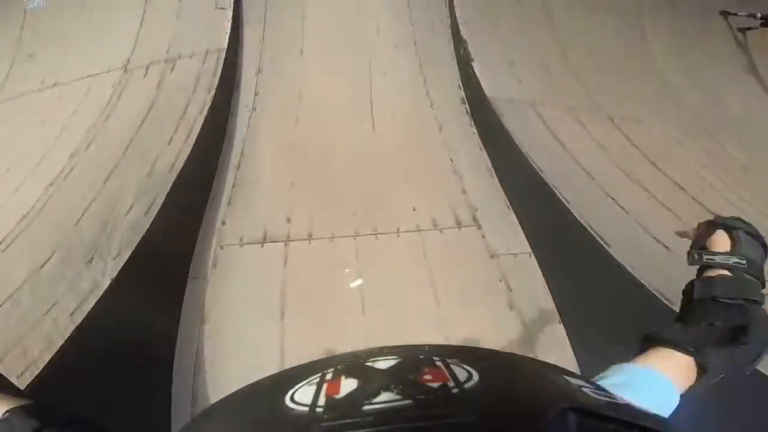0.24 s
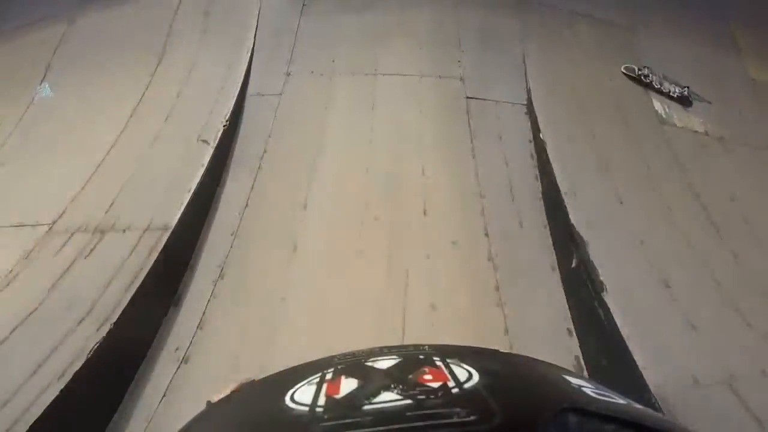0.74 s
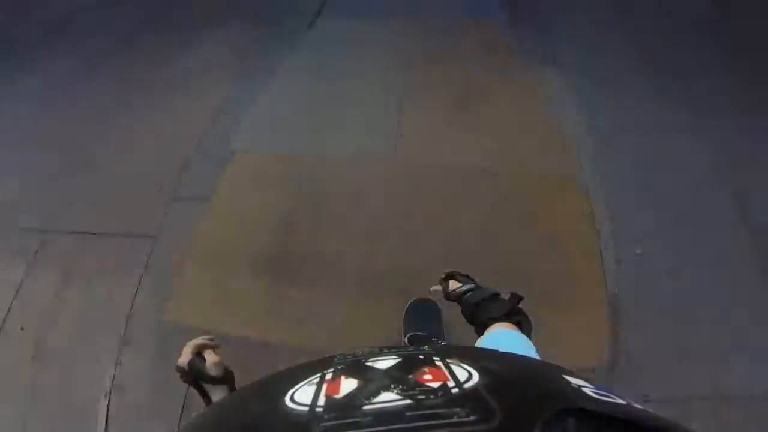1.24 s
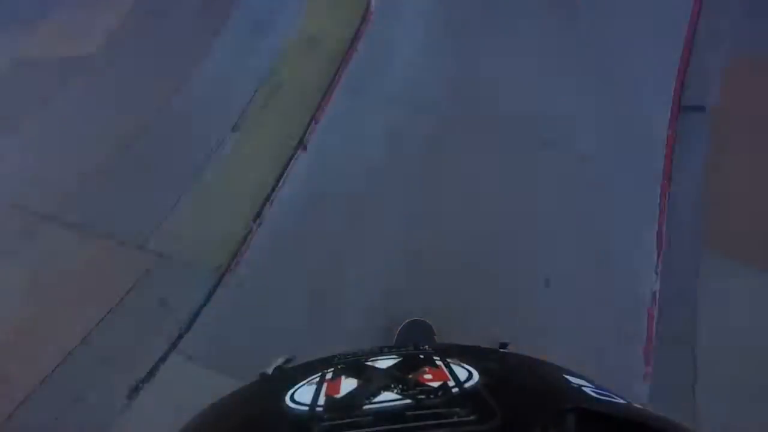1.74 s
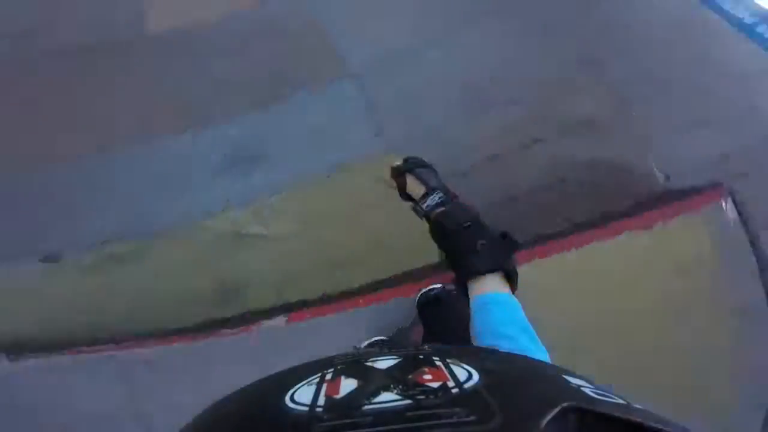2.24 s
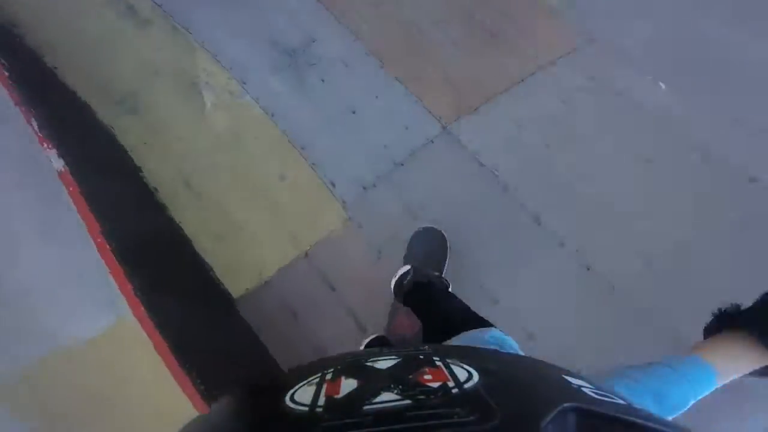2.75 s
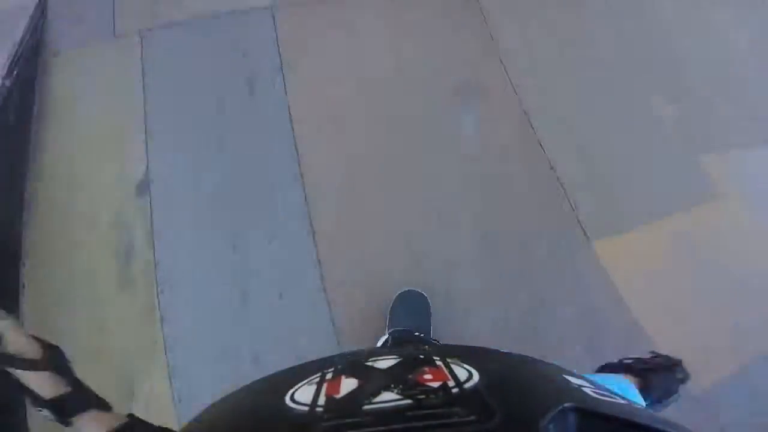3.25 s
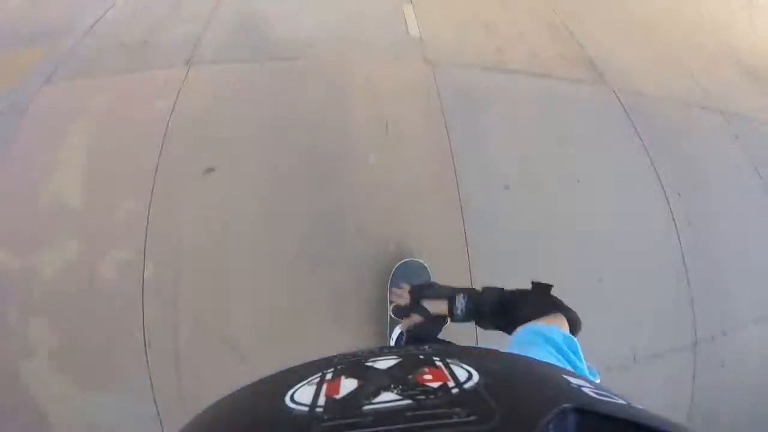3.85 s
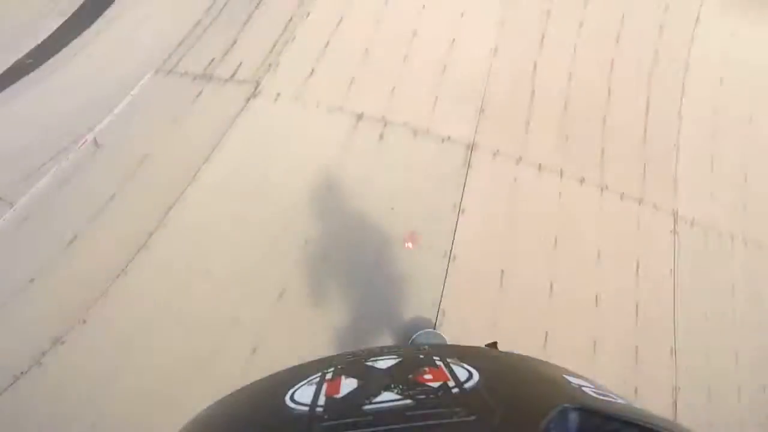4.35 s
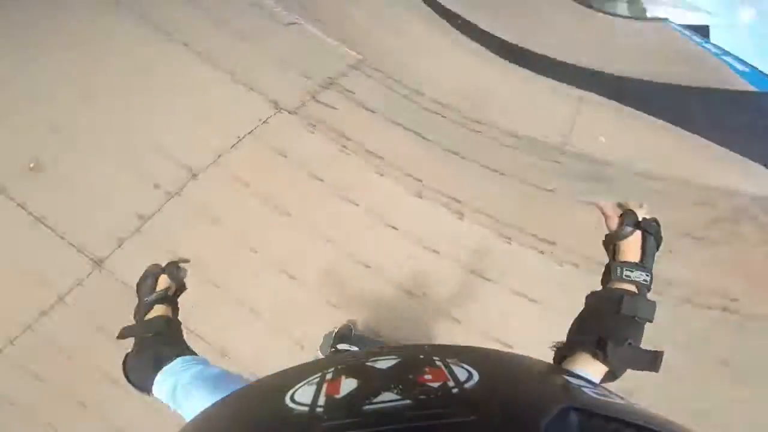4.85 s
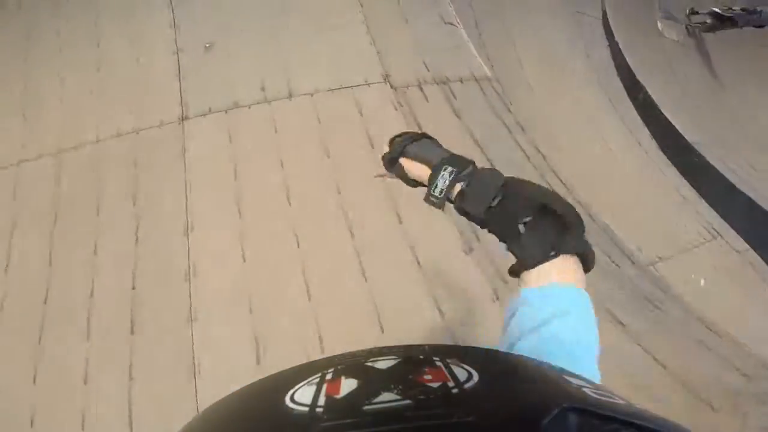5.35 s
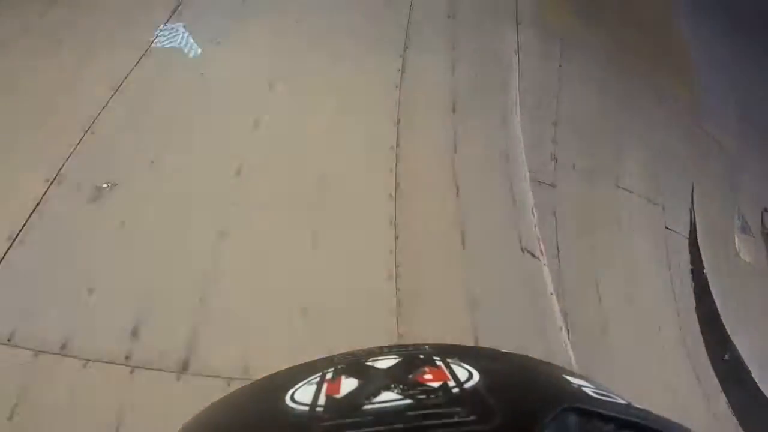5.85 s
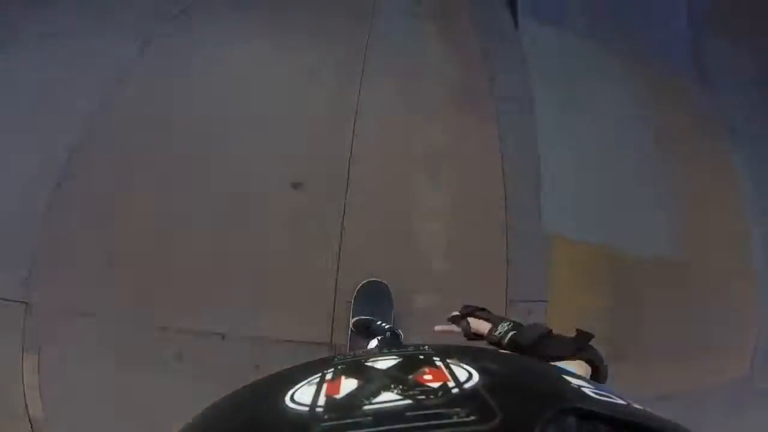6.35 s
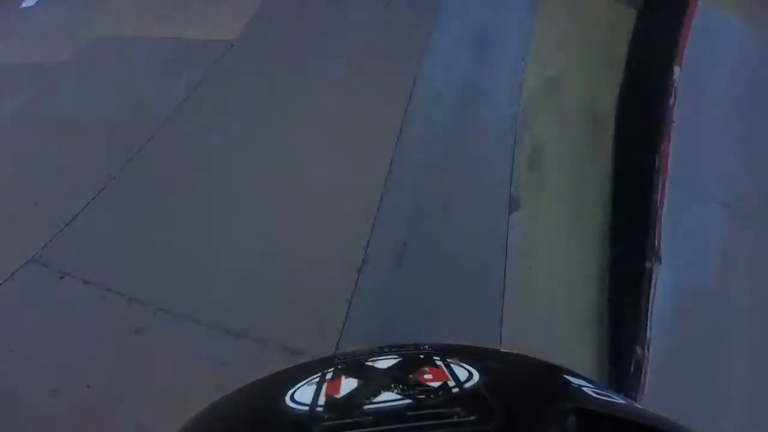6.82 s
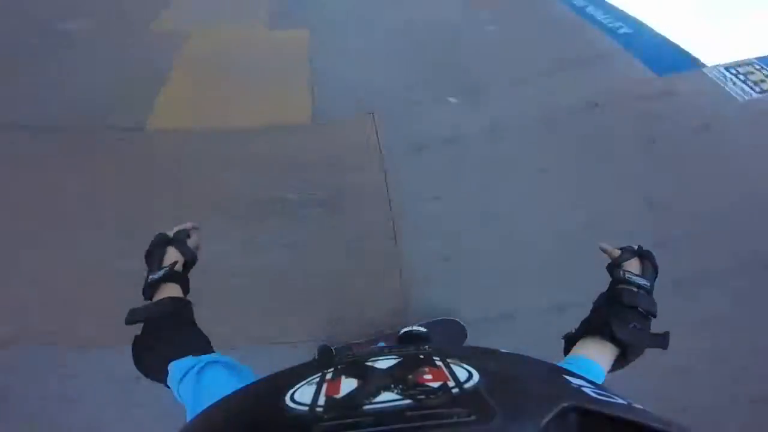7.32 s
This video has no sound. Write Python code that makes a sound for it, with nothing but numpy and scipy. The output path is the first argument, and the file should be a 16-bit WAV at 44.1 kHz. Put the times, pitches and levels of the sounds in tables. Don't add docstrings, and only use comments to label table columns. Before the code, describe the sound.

A helmet-mounted sealed camera hears a skateboard on hollow wooden ramp panels in an open skatepark, with a nasal, boxy ring around 1.4 kHz. At 0-0.5 s rolling fades nearly away, with a tiny squeak and soft knocks. A cluster of knocks and a scrape comes at 0.6-0.7 s, then wheels swell into a rough roar and hiss, with faint wheel singing near 1.2 and 2.2 s. Seams clack at 1.4-2.2 s amid low wind buffeting. Rolling thins around 2.8 s before a hard burst of slams, scraping and deep helmet thuds at 2.95-3.1 s. Rolling returns, with clacks from 3.25 s and a dense run at 4.15-4.6 s. It drops around 5.1-5.6 s, with brief squeaks and gentle knocks, then swells from 5.7 s. A strong clack lands at 6.03 s, lighter ones follow, and the roar eases by 7.6 s.

```python
import sys
import numpy as np
from scipy import signal
from scipy.fft import rfft, irfft
from scipy.io import wavfile
from scipy.ndimage import uniform_filter1d

SR = 44100
rng = np.random.default_rng(int(sys.argv[2]) if len(sys.argv) > 2 else 0)


def int16_out(signal):
    q = np.round(np.clip(np.atleast_2d(signal).T, -1, 1) * 32767)
    wavfile.write(sys.argv[1], SR, q.astype(np.int16))


def gain_from_decibels(decibels):
    exponent = np.asarray(decibels, float) / 20
    return 10 ** exponent


N = 334278
HZ = np.fft.rfftfreq(8192, 1 / SR)
USUAL_DB = -37

# (time [s], rolling level [dB], weight on the panels [dB], head-turn lift of the higher case rings [dB])
RIDE = [(0.0, -48, -13, 6), (0.28, -60, -5, -5), (0.48, -49.5, -14, 3), (0.72, -39, 0, 7),
        (1.1, -36, 0, -2), (2.2, -38.5, 0, -5), (2.8, -43.5, -22, 6), (3.12, -41, -16, 2),
        (3.33, -39.5, 0, -2), (3.7, -35.5, -1.5, -4), (4.65, -36, -4, -3), (5.1, -42.5, -8, 5),
        (5.27, -54, -6, 1), (5.57, -52, -10, 3), (5.74, -39, -12, 8), (6.2, -38, 2, -5), (7.1, -36, -1, -1),
        (7.58, -45, 2, -4)]
# (frequency [Hz], width [Hz], level [dB])
PANEL_MODES = [(230.6, 63, -3), (410, 130, -2), (516, 152, 2), (614, 180, -1), (823, 385, -9.5)]
# (frequency [Hz], width [Hz], level [dB])
CASE_MODES = [(1278, 204, -7), (1371.3, 102, -0.5), (1460.5, 86, -5), (1541.4, 65, -2), (1685, 85, -13)]
# (frequency [Hz], width [Hz], level [dB])
UPPER_MODES = [(2206, 690, 3), (3000, 710, -3), (3286, 330, -5.5), (4010, 200, -10.5), (5320, 510, -24),
               (6270, 260, -25), (6570, 910, -22), (8400, 1100, -28), (9270, 1000, -26.5),
               (11500, 3000, -44)]


def evened(x):
    return x / np.sqrt(np.mean(x ** 2) + 1e-20)


def add(mix, s, sound):
    part = mix[round(s * SR):][:len(sound)]
    part += sound[:len(part)]


def causal(db):
    log = np.log(gain_from_decibels(np.maximum(db - db.max(), -100)))
    mirrored = np.r_[log, log[-2:0:-1]]
    spectrum = np.exp(np.conj(signal.hilbert(mirrored)))
    taps = np.fft.ifft(spectrum).real[:4096]
    return taps / np.linalg.norm(taps)


def rings(modes):
    power = sum(gain_from_decibels(2 * db) / (1 + (2 * (HZ - hz) / width) ** 2) ** 2 for hz, width, db in modes)
    return causal(10 * np.log10(power))


def colour(points):
    hz, db = np.transpose(points)
    return causal(np.interp(np.log(HZ + 1), np.log(hz + 1), db))


def lumps(per_s):
    spectrum = rfft(rng.standard_normal(N))
    return evened(irfft(spectrum / (1 + (np.fft.rfftfreq(N, 1 / SR) / per_s) ** 2), N))


def patchy(x, patch_db):
    z = signal.stft(x, nperseg=512)[2]
    field = uniform_filter1d(rng.standard_normal(z.shape), 6, 0)
    field = uniform_filter1d(field, 22, 1)
    return evened(signal.istft(z * gain_from_decibels(patch_db * evened(field)), nperseg=512)[1][:N])


def curve(table, index):
    s, *columns = np.transpose(table)
    return np.interp(np.arange(N) / SR, s, columns[index])


def flat():
    # (middle [s], half length [s])
    crossings = [
        (1.5, .2),
        (4.1, .24),
        (6.58, .25),
    ]
    return sum(np.exp(-((np.arange(N) / SR - s) / half) ** 4) for s, half in crossings)


def gusts(index):
    # (time [s], wind level [dB], shaking level [dB], time to fall by 10 dB on either side [s])
    gust_rows = [(0.06, -46, -46, .1), (0.6, -47, -43, .14), (0.88, -43, -52, .06), (1.2, -34, -40, .15),
                 (1.53, -32, -36, .07), (1.63, -33, -45, .07), (1.92, -27, -36, .12),
                 (2.1, -29.5, -45, .07), (2.18, -38, -37, .06), (2.72, -43, -60, .08), (2.93, -36, -52, .1),
                 (3.17, -37, -37, .08), (3.37, -30, -40, .1), (3.5, -29, -38, .08), (3.75, -23.5, -39, .1),
                 (3.86, -34, -27, .11), (4.04, -29, -36, .05), (4.2, -40, -31, .12), (4.53, -22, -30, .14),
                 (4.72, -29, -35, .15), (4.98, -42, -36, .07), (5.18, -38, -49, .12), (5.55, -38, -44, .05),
                 (5.72, -38.5, -40.5, .06), (5.84, -32, -37, .1), (6.1, -27, -38, .09),
                 (6.28, -29, -36, .12), (6.55, -33, -42, .06), (6.75, -36, -34.5, .2), (7.2, -27, -37, .18),
                 (7.53, -28, -29, .05)]
    t = np.arange(N) / SR
    fall_db = 10
    return sum(gain_from_decibels(2 * (row[index] - fall_db * abs(t - row[0]) / row[3])) for row in gust_rows)


def rolling():
    roll_db = curve(RIDE, index=0)
    calm_db = -43 + 1.1 * (roll_db - USUAL_DB)
    wind_db = 10 * np.log10(gain_from_decibels(2 * calm_db) + gusts(index=1))
    drum_db = roll_db + curve(RIDE, index=1) - 4.5 * flat()
    press = .15
    return roll_db + press * (wind_db - calm_db), drum_db, wind_db


def wheels():
    bumps = lumps(33)
    specks = rng.random(N) < 160 / SR
    grit = gain_from_decibels(4.0 * np.minimum(rng.exponential(1, N), 5)) * specks * rng.standard_normal(N)

    def heard(modes, bump_db, grit_share):
        drive = gain_from_decibels(bump_db * bumps) * (rng.standard_normal(N) + grit_share * evened(grit))
        return signal.oaconvolve(drive, rings(modes))[:N]

    lift_db = curve(RIDE, index=2)
    roll_db, drum_db, _ = rolling()
    hiss_db = -48 + .75 * (curve(RIDE, index=0) - USUAL_DB) - .45 * lift_db
    hiss_db = hiss_db + 2.5 * flat()
    roar = gain_from_decibels(-lift_db / 2) * heard(CASE_MODES[:2], 0.98, .3)
    roar = roar + gain_from_decibels(lift_db / 2 - 2.0) * heard(CASE_MODES[2:], 0.86, 0.1)
    drum = heard(PANEL_MODES, 1.3, 0.37)
    hiss = heard(UPPER_MODES, 1.12, 0.36)
    return (gain_from_decibels(roll_db) * patchy(roar, 1.25) + gain_from_decibels(drum_db) * patchy(drum, 1.9)
            + gain_from_decibels(hiss_db) * patchy(hiss, 1.97))


def turbulence(spectrum):
    air = gain_from_decibels(1.97 * lumps(16)) * rng.standard_normal(N)
    return evened(signal.oaconvolve(air, colour(spectrum))[:N])


def wind():
    # (frequency [Hz], level per Hz [dB])
    buffeting = [(4.7, -27.5), (8.0, 5.5), (25, 1.5), (60, -9), (78, -32.5), (130, -120)]
    return gain_from_decibels(rolling()[2]) * turbulence(buffeting)


def shaking():
    # (frequency [Hz], level per Hz [dB])
    shake_spectrum = [(32, -27), (55, -5), (70, -1.5), (103, 1), (143, -6), (183, -14), (291, -20),
                      (350, -15), (460, -47), (770, -120)]
    steady_db = -43 + .65 * (rolling()[1] - USUAL_DB)
    shake_db = 10 * np.log10(gain_from_decibels(2 * steady_db) + gusts(index=2))
    return gain_from_decibels(shake_db) * turbulence(shake_spectrum)


def hall():
    # (frequency [Hz], level per Hz [dB])
    background = [(88, -29), (150, -3.5), (385, -12.5), (623, -13), (933, -13), (1110, -16.5),
                  (1320, -10.5), (1480, -4), (2010, -12.5), (2220, -18.5), (2540, -21.5), (6770, -28.5),
                  (14900, -44)]
    return gain_from_decibels(-56) * signal.oaconvolve(rng.standard_normal(N), colour(background))[:N]


def squeaks():
    # (time [s], peak level [dB], frequency [Hz], length [s])
    whistles = [
        (0.054, -43, 2300, 0.022),
        (5.129, -42.5, 2160, 0.022),
        (5.247, -40, 2130, 0.016),
    ]
    out = np.zeros(N)
    for s, db, hz, length in whistles:
        t = np.arange(0, length, 1 / SR)
        fuzz = .22 * np.cumsum(rng.standard_normal(len(t))) / 4
        tone = np.sin(2 * np.pi * hz * t * (1 - .6 * t) + fuzz)
        add(out, s, gain_from_decibels(db) * tone * np.sin(np.pi * t / length) ** 2)
    return out


def struck(blows):
    out, t = np.zeros(N), np.arange(4000) / SR
    duller = signal.butter(2, 4500, fs=SR)
    bodies = [rings(PANEL_MODES[2:4]), rings(CASE_MODES), signal.lfilter(*duller, rings(UPPER_MODES[:4]))]
    for s, db, low_db, high_db, t60, rise_s in blows:
        blow = rng.standard_normal(len(t)) * gain_from_decibels(-60 * t / max(t60, .01)) * np.minimum(t / rise_s, 1)
        blow = blow * (1 + 2.2 * np.exp(-t / .004))
        for body, rel_db in zip(bodies, (low_db - 1.0, -1., high_db + 3.5)):
            sound = signal.fftconvolve(blow, body)
            add(out, s - rise_s, gain_from_decibels(db + rel_db) * sound / abs(sound).max())
    return out


def knocks():
    # (time [s], case peak level [dB], hiss relative to it [dB])
    rocking = [(0.0548, -39, -30), (0.2053, -33, -12), (0.3627, -28, -16), (1.4486, -30, -3),
               (0.5247, -34, -29), (0.602, -22, -22), (0.621, -20, -22), (0.6421, -20, -18),
               (0.653, -18, -16), (0.668, -20, -20), (0.6985, -25.5, -21), (2.5155, -30.5, -24),
               (2.5461, -24.5, -17.5), (3.2038, -28, -22), (5.133, -30, -26), (5.246, -32.5, -17.5),
               (5.5009, -30, -17), (5.6765, -30, -18), (5.8975, -23.5, -30)]
    return struck([(s, db, -17, high_db, .1, .004) for s, db, high_db in rocking])


def ticks():
    # (time [s], peak level [dB], centre frequency [Hz])
    hard_parts = [(0.2064, -55, 5570), (0.3601, -52, 6550), (0.6025, -52, 5560), (0.689, -46, 5560),
                  (0.7922, -38, 6100), (0.855, -47, 5430), (0.925, -41, 5960), (1.8711, -49, 6410),
                  (2.0981, -47, 6430), (2.155, -46, 5320), (2.9505, -34, 6690), (2.9624, -34, 6470),
                  (2.9774, -40, 5270), (3.259, -47, 6800), (3.2954, -50, 5390), (3.714, -38, 4100),
                  (3.773, -46, 4000), (4.347, -53, 6180), (4.4089, -48, 5230), (4.4333, -47, 6100),
                  (4.4593, -51, 6540), (4.49, -37, 4200), (4.5999, -44, 5410), (4.6575, -41.5, 5350),
                  (5.283, -46, 3700), (5.2924, -53, 6370), (5.722, -35, 3300), (5.8012, -52, 6480),
                  (6.0312, -41, 7260), (6.094, -46, 6200)]
    out, t = np.zeros(N), np.arange(1500) / SR
    t60_s, rise_s = .02, .0005
    for s, db, hz in hard_parts:
        burst = rng.standard_normal(len(t)) * gain_from_decibels(-60 * t / t60_s) * np.minimum(t / rise_s, 1)
        body = rings([(hz, 0.3 * hz, 0), (hz, 500, 5), (1.3 * hz, 1500, -5)])[:400]
        click = signal.fftconvolve(burst, body)
        add(out, s - .001, gain_from_decibels(db) * click / abs(click).max())
    return out


def scrapes():
    # (start [s], length [s], case level [dB], panels relative [dB], hiss relative [dB])
    drags = [
        (0.592, .088, -35, -14, -15),
        (2.95, .048, -28, -1, -7),
        (3.03, .1, -43, -4, -5),
    ]
    out = np.zeros(N)
    edge_s, spray_db = .012, -37
    treble = signal.butter(2, 9500, "high", fs=SR)
    for s, length, db, low_db, high_db in drags:
        t = np.arange(0, length, 1 / SR)
        slips = gain_from_decibels(3.0 * evened(uniform_filter1d(rng.standard_normal(len(t)), size=150)))
        fade = np.clip(np.minimum(t, length - t) / edge_s, 0, 1)
        drag = slips * rng.standard_normal(len(t)) * fade
        body = gain_from_decibels(low_db) * rings(PANEL_MODES[1:]) + rings(CASE_MODES) + gain_from_decibels(high_db) * rings(UPPER_MODES)
        add(out, s, gain_from_decibels(db) * signal.fftconvolve(drag, body))
        add(out, s, gain_from_decibels(db + spray_db) * signal.lfilter(*treble, drag))
    return out


def jolts():
    # (time [s], peak level [dB], wobble [Hz], 60 dB decay [s], slow sway relative [dB])
    body_jolts = [(0.699, -25, 93, 0.033, -22), (1.517, -17.5, 75, .06, -17), (2.9938, -5.5, 62, 0.06, -10),
                  (3.022, -23.5, 50.4, .08, -23), (3.0303, -3, 87, 0.022, -14), (3.038, -15, 60, .06, -12),
                  (3.052, -20.5, 92.7, 0.3, -20), (3.062, -14.5, 39.6, 0.082, -23),
                  (3.089, -14, 90.7, 0.21, -4), (3.264, -19, 82, 0.039, -16), (4.029, -16, 81.6, 0.031, -7),
                  (5.737, -27, 91.5, 0.024, -10), (7.528, -28, 68.4, 0.054, -14)]
    out, t = np.zeros(N), np.arange(12000) / SR
    snap = 0.15 * np.exp(-((t - .0025) / 0.0019) ** 2)
    for s, db, hz, t60, sway_db in body_jolts:
        turns = hz * (t + .0035 * (1 - np.exp(-t / .004)))
        wobble = -gain_from_decibels(3 - 60 * t / t60) * np.sin(2 * np.pi * turns) * np.minimum(t / .0012, 1)
        sway = gain_from_decibels(sway_db - 60 * t / 0.27) * np.sin(2 * np.pi * 19 * t)
        add(out, s, gain_from_decibels(db) * (wobble + sway - snap))
    jolt_low_pass = signal.butter(2, 1500, fs=SR)
    return signal.lfilter(*jolt_low_pass, out)


def songs():
    # (middle [s], half length [s], top turning rate [Hz])
    passages = [
        (1.21, .17, 214),
        (2.2, .16, 228),
    ]
    # (multiple of the turning rate, level [dB])
    harmonics = [(2, -50), (3, -47), (6, -46)]
    out = np.zeros(N)
    sag = .1
    for s, half, hz in passages:
        u = np.arange(-half, half, 1 / SR) / half
        waver = .004 * np.cumsum(rng.standard_normal(len(u)))
        turn = 2 * np.pi * np.cumsum(hz * (1 - sag * u ** 2)) / SR + waver
        tones = sum(gain_from_decibels(db) * np.sin(k * turn) for k, db in harmonics)
        add(out, s - half, np.sqrt(2 - 2 * u ** 2) * tones)
    return out


def seams():
    # (time [s], case peak level [dB], panels relative [dB], hiss relative [dB])
    crossed = [(1.391, -23.5, -25, -19), (1.5524, -15.5, -14, -17), (1.6226, -20, -24, -11),
               (1.8692, -22.5, -7, -11), (1.917, -25.5, 5, -16), (1.963, -27, -3.5, -22),
               (2.1559, -23.5, -6, -10), (3.257, -19, -21, -16.5), (3.2974, -21, -24, -20),
               (3.715, -16.5, -14, -14), (3.7723, -25, 0.5, -7), (4.157, -21, -3, -12),
               (4.22, -19, -4, -12), (4.2288, -16, -30, -28), (4.291, -17, -9.5, -16.5),
               (4.348, -22, -6, -9), (4.4098, -27, -3, -4), (4.4586, -17.5, -15, -19),
               (4.491, -24.5, -7, -25), (4.5288, -25, -11, -13), (4.6032, -25.5, -10, -8),
               (5.8028, -19.5, -17, -12), (6.0294, -12, -12.5, -15.5), (6.092, -19, -6.5, -17),
               (6.2155, -26, -20, -14), (6.3535, -25, -19, -20), (6.4951, -20, -29, -21),
               (6.6324, -25, -24, -27), (7.0463, -30.5, 2.5, -30), (7.2998, -25.5, -3.5, -25)]
    return struck([(*row, .042, .0015) for row in crossed])


def landing():
    # (time [s], case peak level [dB], panels relative [dB], hiss relative [dB], 60 dB decay [s])
    slams = [
        (2.9504, -11, 1, -10, 0.038),
        (2.9642, -9, -12, -10, 0.06),
        (2.9782, -22, -3, -6, 0.06),
        (2.993, -13, -8, -13, 0.045),
        (3.0317, -16, -9, -17, 0.04),
        (3.069, -30, -10, -8, .06),
        (3.0915, -22, -5.5, -11.5, 0.13),
    ]
    return struck([(*row, .0015) for row in slams])


def scene():
    rolling_on = wheels() + wind() + shaking() + hall()
    events = squeaks() + knocks() + ticks() + scrapes() + jolts() + songs() + seams() + landing()
    return (rolling_on + events)[None]


def roll_off(x):
    return signal.sosfilt(signal.butter(12, 15560, fs=SR, output="sos"), x)


def record(dry):
    hz, _, z = signal.stft(dry, SR, nperseg=1024)
    usual = uniform_filter1d(uniform_filter1d(abs(z), size=15, axis=1), size=5, axis=2)
    top = hz[:, None] >= 12800
    gain = np.where(top, 1.25 * (abs(z) > 1.05 * usual), 1)
    thinned = signal.istft(z * gain, SR, nperseg=1024)[1][:, :N]
    limited = signal.oaconvolve(thinned, signal.firwin(401, 15140, fs=SR)[None], "same")
    return roll_off(limited)


dry = scene()
out = record(dry)
int16_out(out)
```